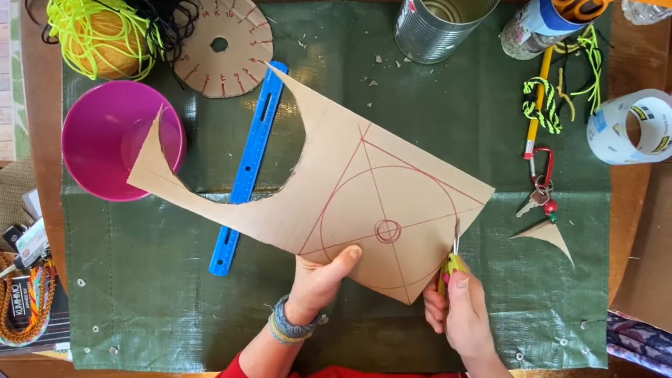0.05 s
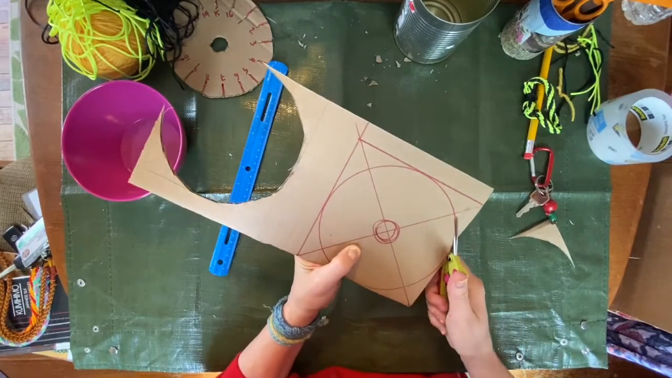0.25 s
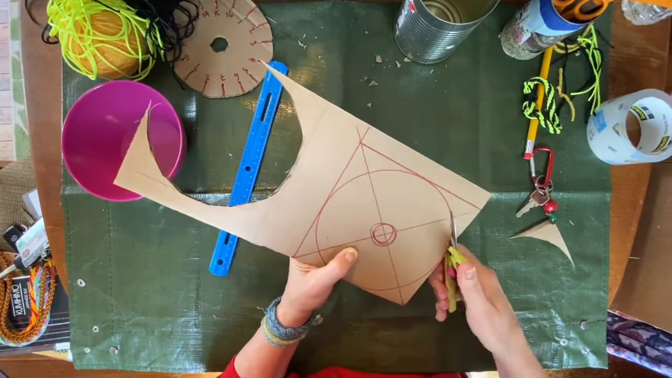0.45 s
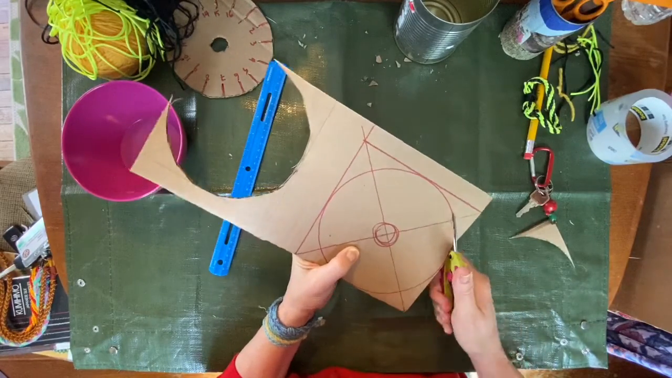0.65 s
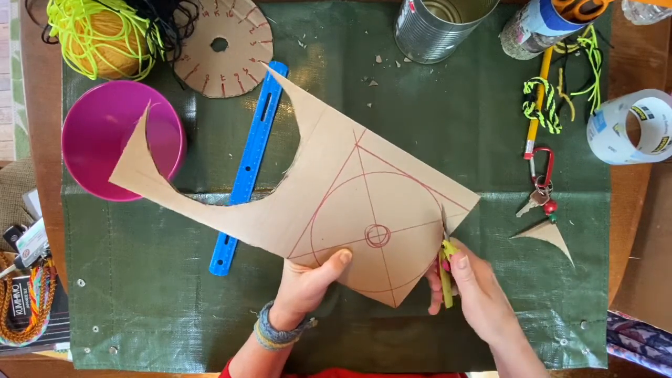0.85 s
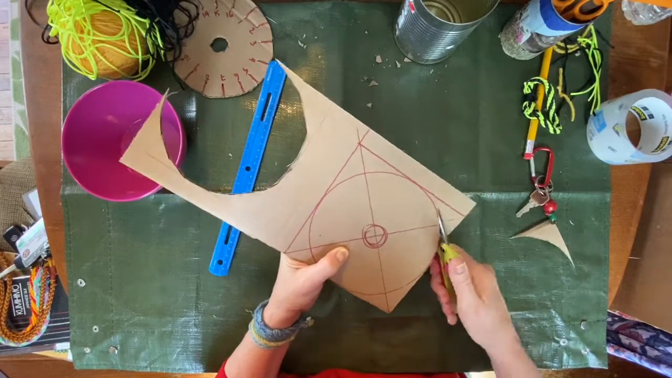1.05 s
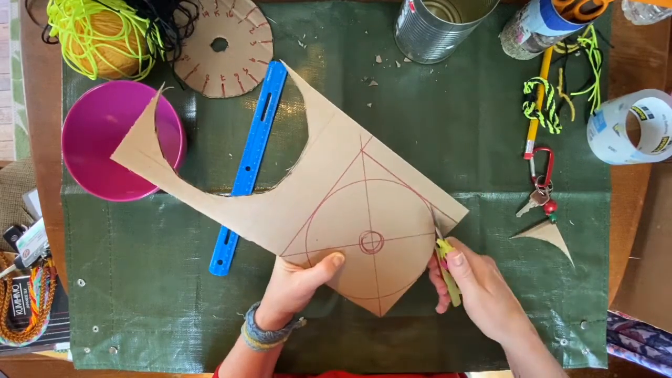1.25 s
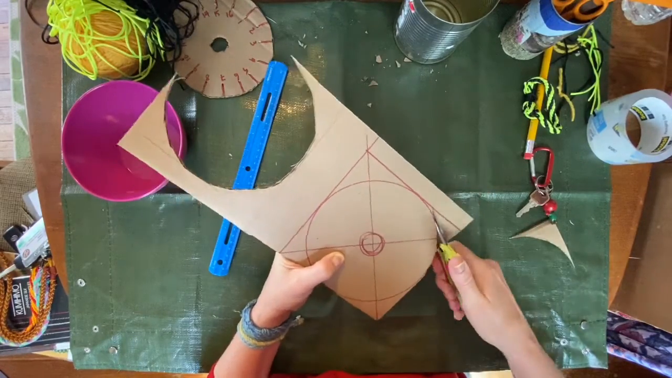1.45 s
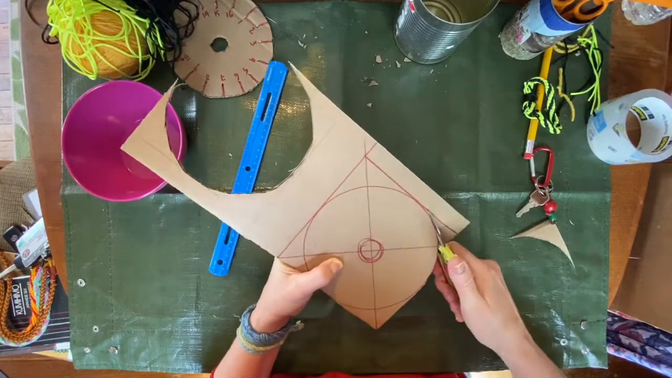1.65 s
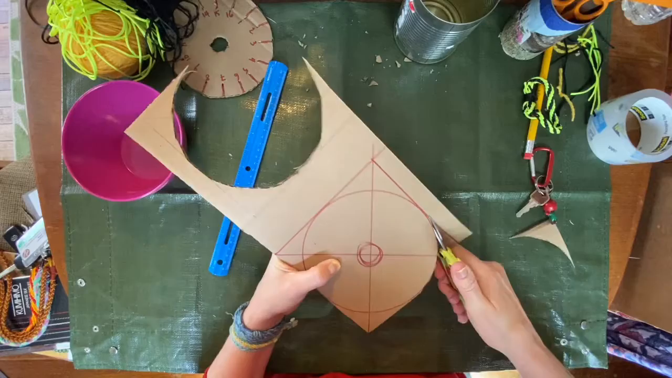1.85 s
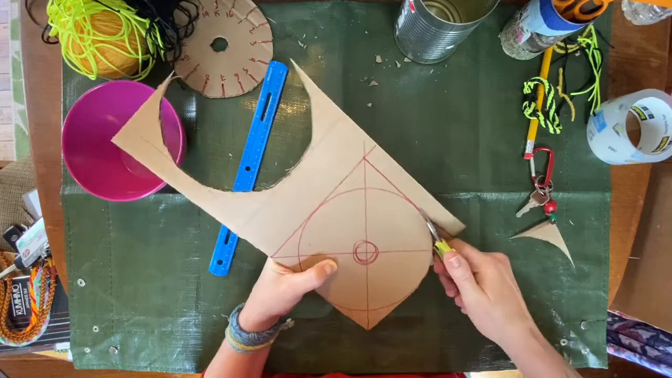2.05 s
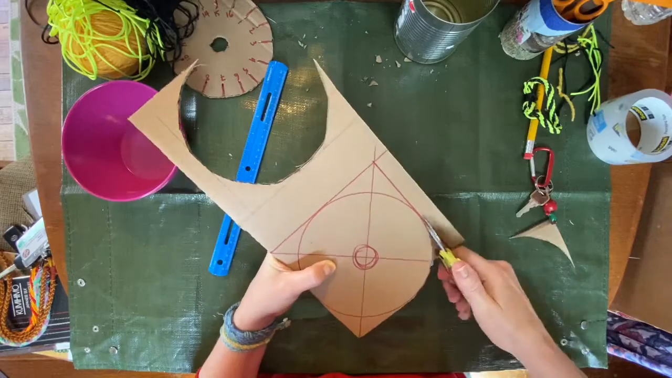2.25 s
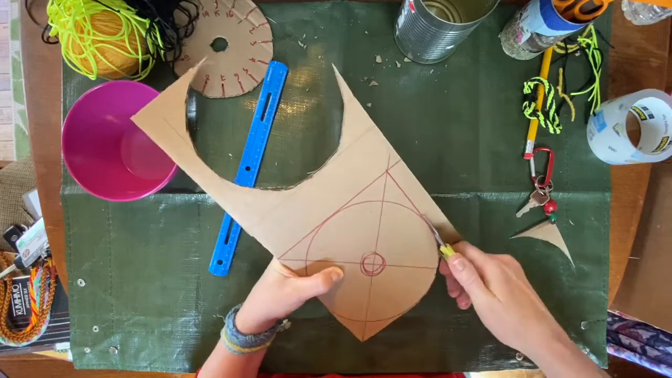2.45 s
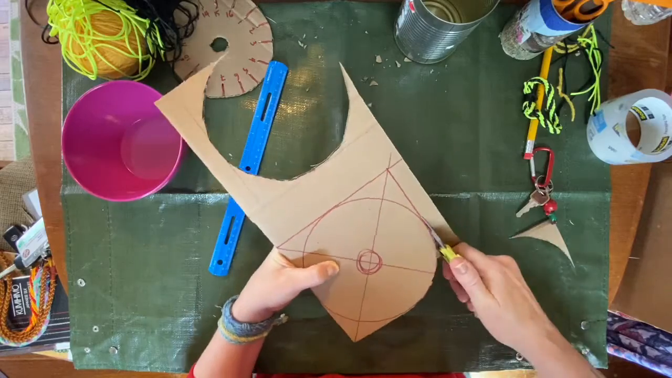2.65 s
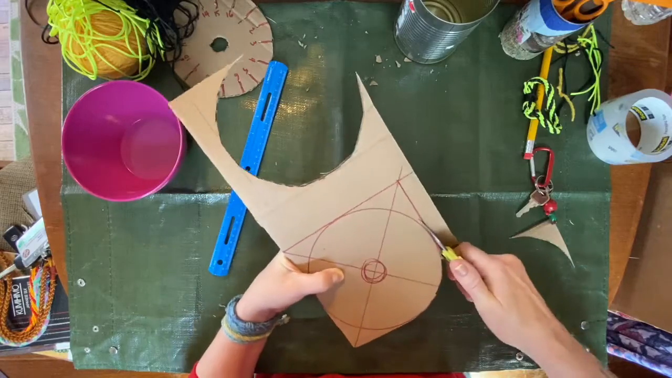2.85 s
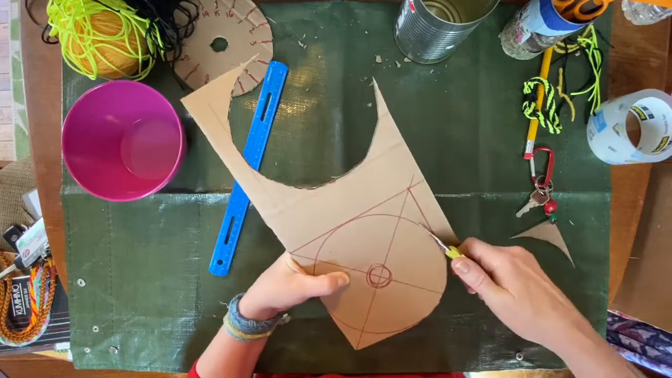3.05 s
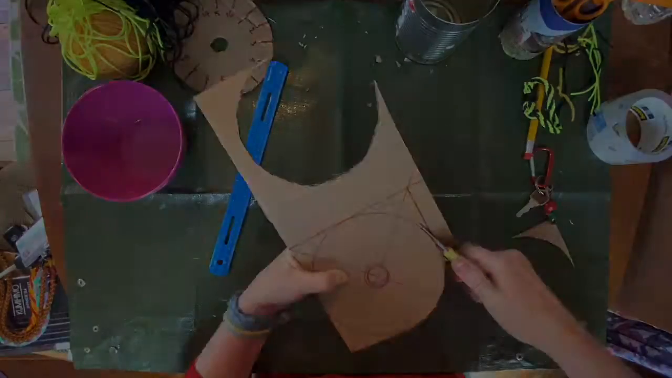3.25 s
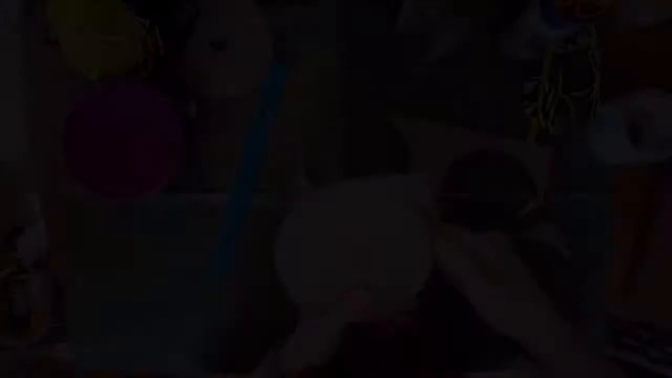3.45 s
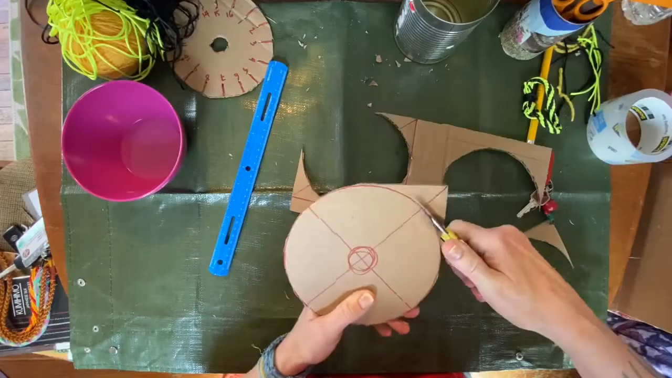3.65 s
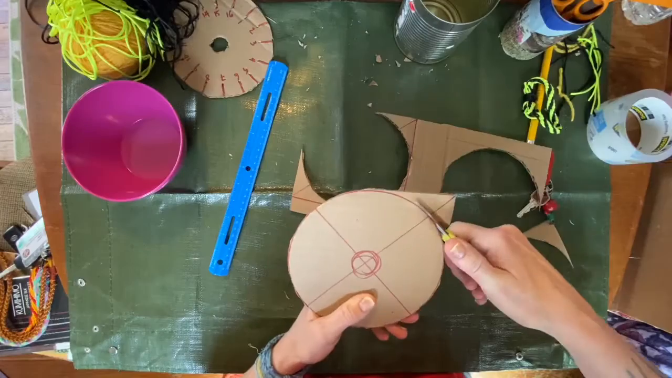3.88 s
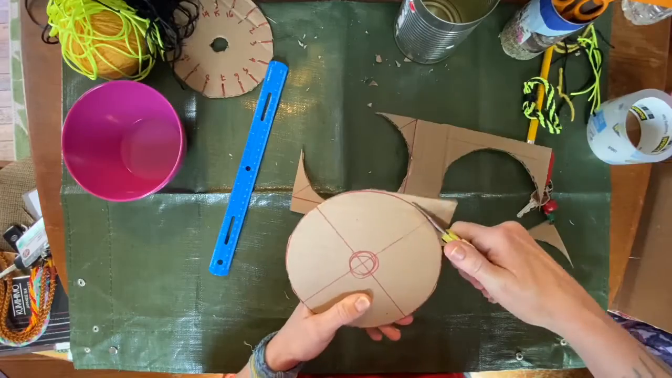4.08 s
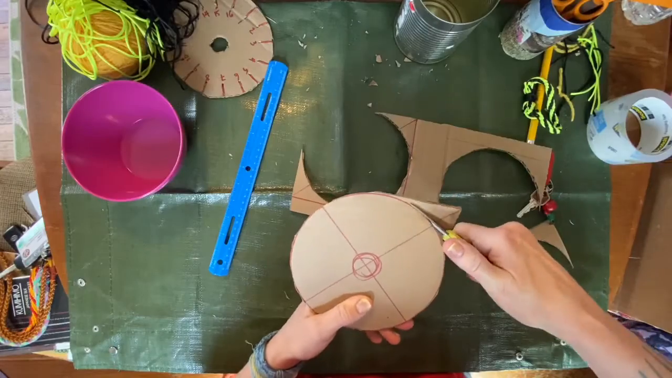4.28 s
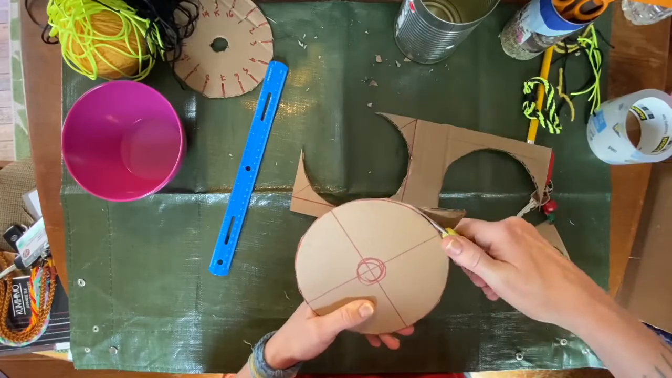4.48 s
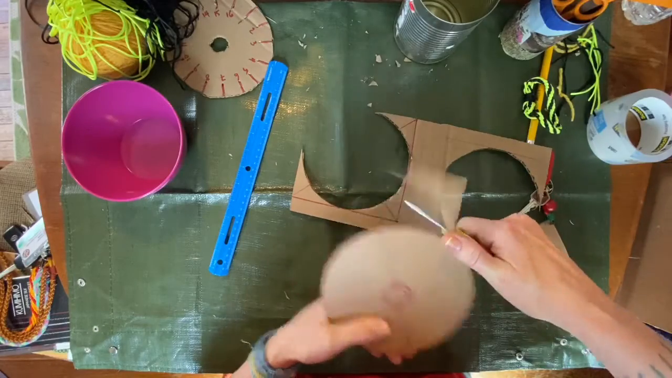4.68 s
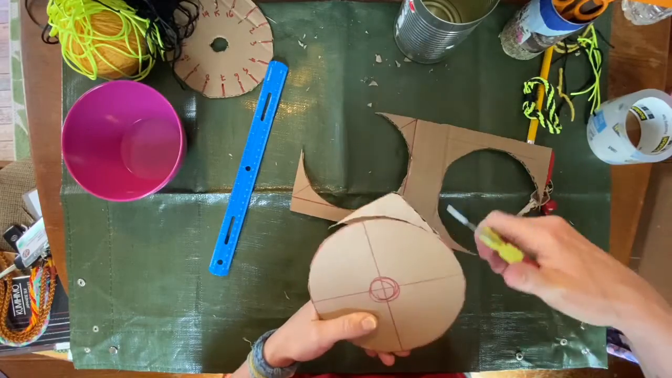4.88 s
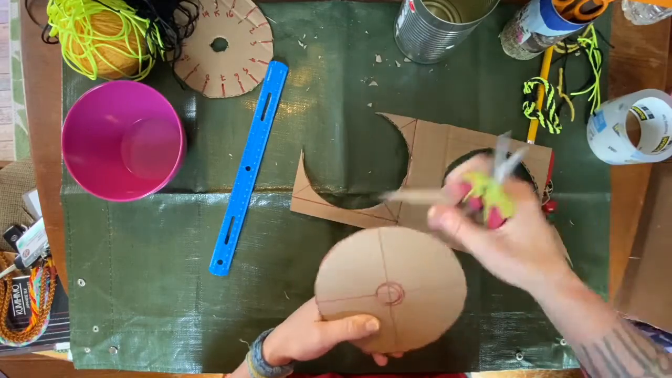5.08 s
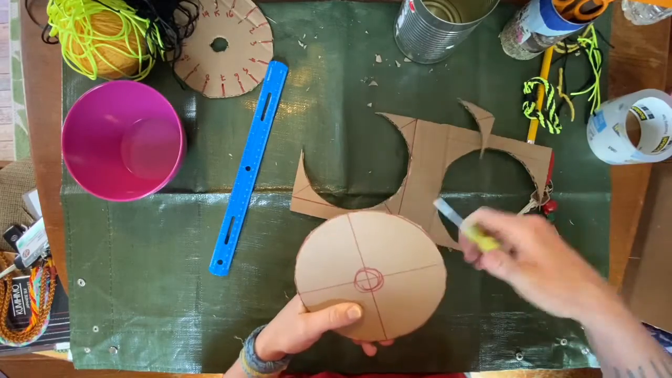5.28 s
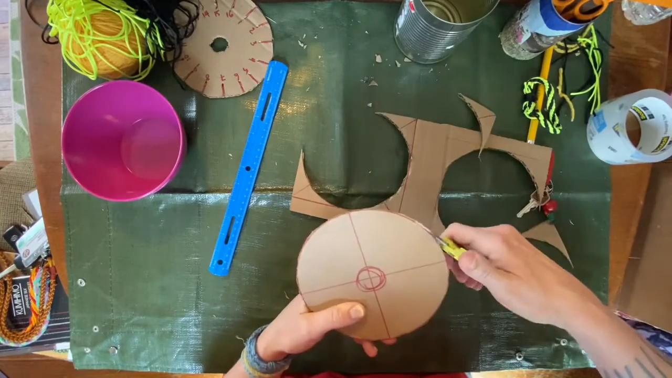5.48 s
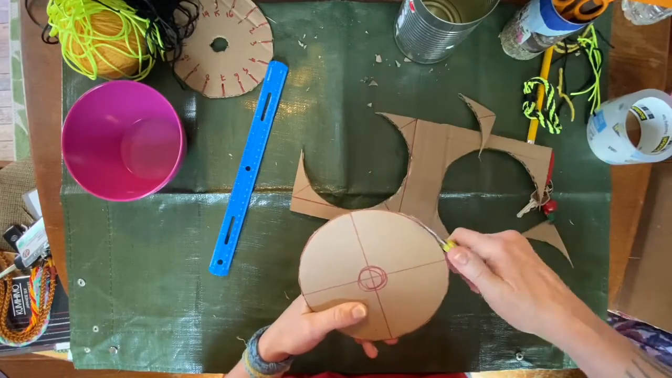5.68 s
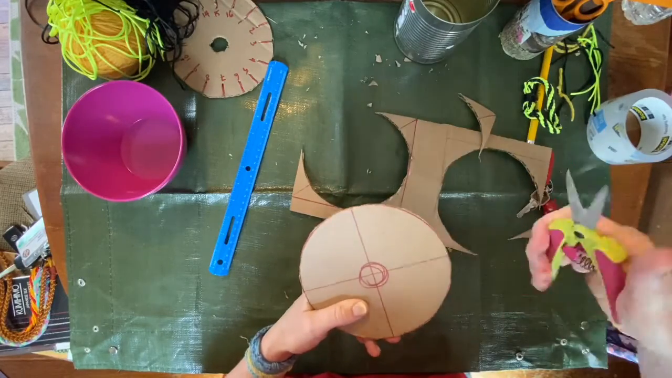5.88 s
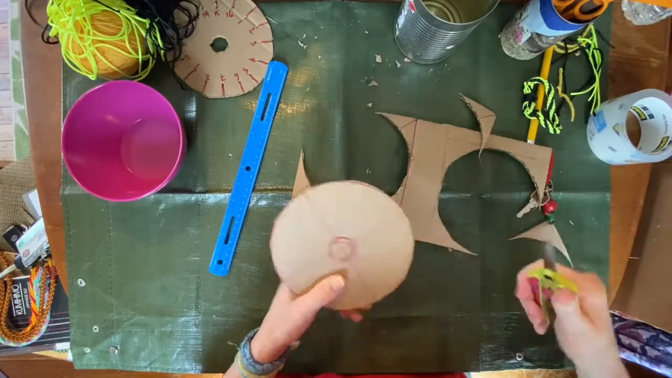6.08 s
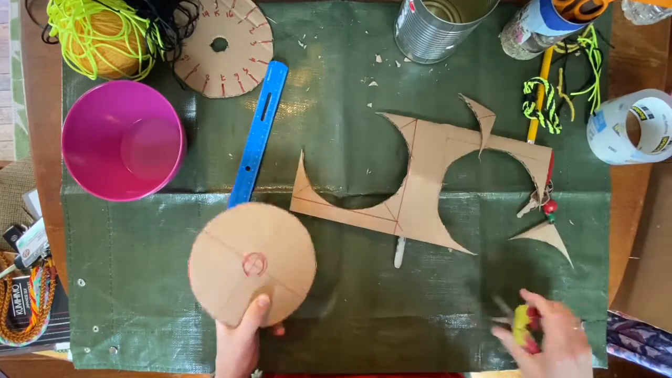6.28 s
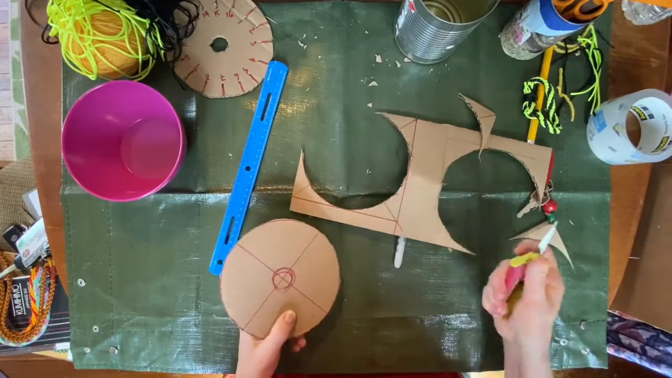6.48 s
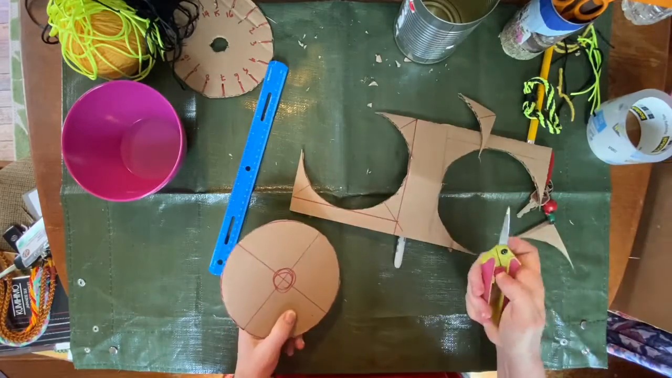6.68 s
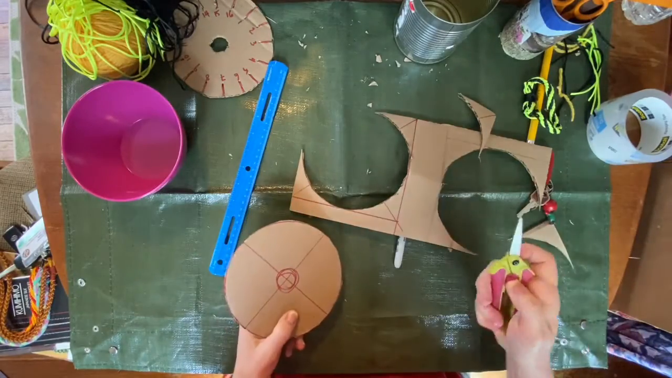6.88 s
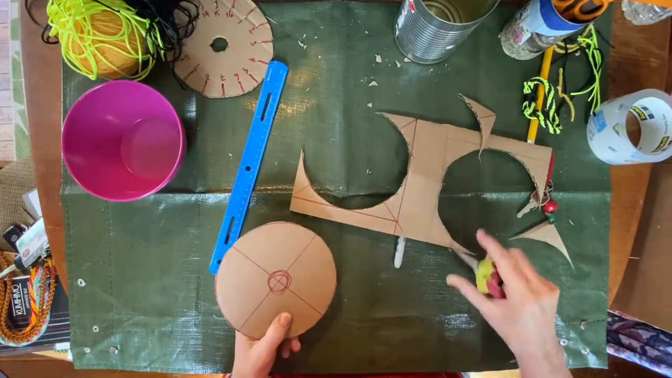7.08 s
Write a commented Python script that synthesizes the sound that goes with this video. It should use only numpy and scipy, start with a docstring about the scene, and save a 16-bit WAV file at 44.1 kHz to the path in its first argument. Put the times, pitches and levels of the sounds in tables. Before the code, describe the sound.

Crisp, irregular scissor cuts crack through a cardboard sheet, with soft blade scraping between them, thinning out near the end.

```python
"""Small scissors snip round a disc of corrugated cardboard over a table, a phone looking down on it. Each bite
cracks the fibres and rings the sheet; between bites the blades scrape along the cut in dense stick-slip ticks.
A fridge-like motor hum and room air fill the small room. Near the end the background level drops and returns in
surges while the phone mount rumbles and creaks."""
import sys
import numpy as np
from scipy import signal
from scipy.fft import rfft, irfft
from scipy.io import wavfile
from scipy.ndimage import uniform_filter1d

SR = 44100
rng = np.random.default_rng(int(sys.argv[2]) if len(sys.argv) > 2 else 0)


def dump_mix(stems):
    """Bounce the given channels to the path in sys.argv[1] as a 16-bit WAV at rate SR."""
    frames = np.atleast_2d(stems).T  # one column per channel
    limited = np.clip(frames, -1, 1)  # hard clip at full scale
    pcm = np.round(limited * 32767).astype(np.int16)
    wavfile.write(sys.argv[1], SR, pcm)


N = 314433
LEFT_RIGHT = np.array([[1], [-1]])


def undb(db):
    return 10 ** (np.asarray(db) / 20)


def at_rms(x, db):
    return x * undb(db) / np.sqrt(np.mean(x ** 2))


def at_peak(x, db):
    """Scale so the envelope over the loudest 3 ms reaches db."""
    return x * undb(db) / np.sqrt(2 * uniform_filter1d(x ** 2, int(.003 * SR)).max())


def along(table, hz):
    """Read (Hz, value) points on a log-frequency axis."""
    freqs, values = np.transpose(table)
    return np.interp(np.log(hz + 1), np.log(freqs + 1), values)


def colour(x, table):
    """Filter by (Hz, dB) points."""
    hz = np.fft.rfftfreq(x.shape[-1], 1 / SR)
    return irfft(rfft(x) * undb(along(table, hz)), x.shape[-1])


def mode(hz, centre_hz, t60_s):
    """Spectrum of a clicked resonance: initial amplitude 1, T60 at least 2 ms."""
    pole = np.log(1000) / max(t60_s, .002) + 2j * np.pi * hz
    return SR * pole / (pole ** 2 + (2 * np.pi * centre_hz) ** 2)


def drift(rate_hz):
    """Random steps, smoothed twice; spread near 1."""
    hold = int(SR / rate_hz)
    steps = np.repeat(rng.standard_normal(N // hold + 1), hold)
    return 1.3 * uniform_filter1d(uniform_filter1d(steps, hold), hold)[:N]


# Motor tones. Each row: frequency in Hz, RMS level in dB before the fader.
HUM_TONES = [(59, -96), (118, -71), (240, -71.5), (1685, -85)]
# Room air. Each row: frequency in Hz, relative level in dB.
AIR_SPECTRUM = [(24, -62), (40, -39.5), (81, -21.5), (118, -2), (180, -27), (243, -5.5), (312, -18.5),
                (422, -17), (630, -35.5), (1720, -51), (2050, -47), (16000, -61.5)]
# Background faders, end values held. Each row: time in seconds, hum and air gain in dB,
# mount rumble in dB, mount creak in dB.
FADERS = [(6.774, -8, -93.5, -100), (6.794, -24, -76.5, -93), (6.83, -24, -64, -91),
          (6.925, -7.5, -66.5, -79), (6.954, -14.5, -46.5, -73), (6.984, -12, -51, -81),
          (7.05, -13.5, -61, -84.5), (7.066, 0.5, -57, -65), (7.095, 0.5, -43.5, -87),
          (7.13, -14, -50, -75)]


def fader(column):
    points = np.array(FADERS)
    return undb(np.interp(np.arange(N) / SR, points[:, 0], points[:, column]))


def hum_and_air():
    """Motor tones waver in phase over nearly mono room air."""
    t = np.arange(N) / SR
    hum = sum(np.sqrt(2) * undb(db) * np.sin(2 * np.pi * hz * t + .66 * drift(8)) for hz, db in HUM_TONES)
    mid, side = colour(rng.standard_normal((2, N)), AIR_SPECTRUM)
    air = at_rms(mid + undb(-20) * side * LEFT_RIGHT, -54) * undb(1.5 * drift(2.7))
    return (hum + air) * fader(1)


def stick_slip(ticks_per_s=2200, spread_db=3.5, smooth_share=1.1):
    """Spectrum of fibres giving under the blades; pressure flutters over the corrugations."""
    hits = rng.random(N) < ticks_per_s / SR
    sizes = undb(spread_db * np.minimum(rng.exponential(size=N), 4))
    ticks = at_rms(hits * sizes * rng.standard_normal(N), 0)
    friction = ticks + smooth_share * rng.standard_normal(N)
    return rfft(friction * undb(1.8 * drift(110) + 1.8 * drift(40)))


# Fibre crunch and the brighter crack. Each row: frequency in Hz, relative level in dB.
CRUNCH_SPECTRUM = [(1200, -21.5), (2300, -15.5), (3000, -5), (3900, -4.5), (5200, -3), (6500, -8),
                   (9000, -22)]
CRACK_SPECTRUM = [(4000, -27.5), (6500, -3), (8200, 2.5), (10000, 4.5), (12800, 5), (15500, -5)]


def fibre_hiss(friction, hz, crack_db=-10.5, patchy_db=4.5):
    """Fibres give unevenly, so five bands of hiss swell independently."""
    centres_hz = 2500 * 1.6 ** np.arange(5)[:, None]
    bands = np.exp(-(np.log2((hz + 1) / centres_hz) / .45) ** 2)
    bands /= bands.sum(axis=0) + 1e-3
    bright = friction * (undb(along(CRUNCH_SPECTRUM, hz)) + undb(along(CRACK_SPECTRUM, hz) + crack_db))
    return at_rms(sum(undb(patchy_db * drift(35)) * irfft(bright * band, N) for band in bands), 0)


# Cardboard modes. Each row: frequency in Hz, relative level in dB, nominal T60 in seconds.
SHEET_MODES = [(197, -6, 0.036), (315, -15.5, 0.015), (495, -7, 0.017), (784.3, -6.5, 0.037),
               (998, -4.5, 0.023), (1273, -5, 0.022), (1387, -4.5, 0.032), (1618, -3.5, 0.053),
               (1793, -1, 0.018), (1991, -8.5, 0.061), (2020, -1, 0.0016)]


def sheet_rasp(friction, hz, t60_scale=.39):
    """Friction drives the hand-damped sheet, less its two lowest modes."""
    sheet = sum((-1) ** k * undb(db) * mode(hz, mode_hz, t60_scale * t60_s)
                for k, (mode_hz, db, t60_s) in enumerate(SHEET_MODES[2:]))
    return at_rms(irfft(friction * sheet / (1 + (hz / 3200) ** 4), N), 0)


# Blade strokes. Each row: start in seconds, length in seconds, rasp level in dB, hiss in dB re rasp.
STROKES = [(0.025, 0.15, -63.5, 0), (0.345, 0.07, -55.5, 3.5), (0.416, 0.064, -54, -3),
           (0.543, 0.038, -50.5, -7), (0.603, 0.1, -61.5, 6), (0.75, 0.029, -53.5, 5),
           (0.79, 0.041, -55, 0), (0.84, 0.055, -62.5, 1.5), (0.926, 0.035, -56, -1.5),
           (0.977, 0.075, -52.5, -0.5), (1.104, 0.042, -54, 0), (1.174, 0.06, -51.5, 5),
           (1.219, 0.076, -59.5, -9), (1.335, 0.075, -56, -5.5), (1.522, 0.1, -55.5, -8.5),
           (1.638, 0.048, -65, 6), (1.73, 0.046, -66, -3), (1.888, 0.033, -50.5, 2),
           (1.914, 0.066, -61, -4), (2.032, 0.045, -58.5, -4), (2.114, 0.019, -59, 1.5),
           (2.28, 0.025, -54, -9), (2.359, 0.076, -63, -1), (2.411, 0.015, -53, 4), (2.482, 0.025, -64, 2),
           (2.526, 0.14, -65, 1.5), (2.709, 0.044, -53, 6.5), (2.766, 0.038, -53.5, -2),
           (2.841, 0.028, -71, 13), (3.003, 0.04, -55, 7.5), (3.054, 0.047, -56, -5),
           (3.151, 0.065, -57.5, 1.5), (3.313, 0.027, -52, 5.5), (3.346, 0.067, -59, 2),
           (3.584, 0.061, -61, 8), (3.736, 0.045, -56, -0.5), (3.874, 0.018, -58, -20),
           (3.897, 0.033, -54, 9.5), (4.002, 0.059, -64.5, 5), (4.127, 0.056, -57.5, 1),
           (4.221, 0.021, -58, 2.5), (4.288, 0.049, -62, 7.5), (4.447, 0.089, -56.5, 5.5),
           (4.589, 0.027, -65, 11), (4.634, 0.027, -53.5, 4.5), (4.73, 0.047, -45.5, -3.5),
           (5.106, 0.033, -55.5, 7), (5.175, 0.047, -69.5, 2), (5.26, 0.014, -66.5, 14.5),
           (5.325, 0.013, -59.5, 5), (5.394, 0.019, -61, -3), (5.435, 0.021, -71, 14),
           (5.559, 0.031, -83.5, -8), (5.682, 0.05, -59, 5), (5.866, 0.027, -82.5, 15),
           (6.015, 0.044, -75, 10.5), (6.092, 0.063, -69, 13.5), (6.15, 0.098, -67.5, 5.5),
           (6.253, 0.15, -71, 5), (6.423, 0.03, -71.5, 14.5), (6.575, 0.046, -69, -14),
           (6.72, 0.036, -84, -1), (6.81, 0.09, -77, -8), (7.002, 0.047, -83, 8)]
# Strip between the blades. Each row: time in seconds, pitch in Hz.
STRIP_PITCH = [(0, 3930), (1.6, 4030), (2.1, 4700), (2.7, 3380), (3.45, 3430), (3.55, 1730), (4.9, 1770),
               (5.1, 2900), (5.4, 1826), (5.8, 1850), (6.0, 2780), (6.3, 4500), (6.55, 1600), (6.8, 3750),
               (7.0, 2280)]


def blade_scrapes(rise_s=.0051, fade_s=.0046, swell_db=3.2, sag_db=-5, sing_db=-14.5):
    """Sliding blades rasp and hiss, and the strip between them sings; pressure swells, then sags."""
    t, hz = np.arange(N) / SR, np.fft.rfftfreq(N, 1 / SR)
    friction = stick_slip()
    rasp, hiss, slip = sheet_rasp(friction, hz), fibre_hiss(friction, hz), irfft(friction, N)
    out = np.zeros(N)
    for start_s, length_s, rasp_db, bright_db in STROKES:
        span = slice(max(int((start_s - .05) * SR), 0), int((start_s + length_s + .1) * SR))
        age_s = t[span] - start_s
        gate = np.exp(np.minimum(age_s, 0) / rise_s - np.maximum(age_s - length_s, 0) / fade_s)
        progress = np.clip(age_s / length_s, 0, 1)
        pressure = undb(swell_db * np.sin(np.pi * progress) + sag_db * (progress - .5))
        hiss_db = rasp_db + bright_db
        strip = signal.iirpeak(np.interp(start_s, *np.transpose(STRIP_PITCH)), Q=9, fs=SR)
        sing = at_rms(signal.lfilter(*strip, slip[span]), max(rasp_db, hiss_db) + sing_db)
        out[span] += gate * pressure * (undb(rasp_db) * rasp[span] + undb(hiss_db) * hiss[span] + sing)
    shifting_fingers = (rasp + hiss) * undb(-89 + 6 * drift(14))
    return out + shifting_fingers


def fibre_burst(ms, strain_ms=.9, tear_ms=1.69, creak_ms=4, fray_ms=7.6, grit_db=15.5):
    """Spectrum of one gritty break: fibres creak and strain before 0 ms, tear and fray after."""
    before = np.exp(-abs(ms) / strain_ms) + undb(-24) * np.exp(-abs(ms) / creak_ms)
    after = np.exp(-abs(ms) / tear_ms) + undb(-20.5) * np.exp(-abs(ms) / fray_ms)
    noise, roughness = rng.standard_normal((2, len(ms)))
    grit = undb(grit_db * uniform_filter1d(roughness, size=9))
    return rfft(noise * grit * np.where(ms < 0, before, after))


# Blade bites. Each row: time in seconds, ring level in dB, ring pitch in Hz, crunch in dB re ring,
# crunch pitch in Hz, crack in dB re ring, bass in dB re ring.
BITES = [(0.0925, -32, 2080, -4, 3040, -1.5, -8.5), (0.1009, -31.5, 1700, -8, 3500, -8, -11),
         (0.264, -25.5, 1860, -1, 6400, -8, -18.5), (0.2791, -33, 1410, -1.5, 3560, -5, -9),
         (0.5653, -40, 1740, 5, 4300, -11, -2.5), (0.6061, -29, 1720, -11, 3100, -25, -14),
         (0.6235, -30.5, 1420, -8, 6500, -5, -5.5), (0.6597, -22, 2040, -8.5, 6700, -9, -20),
         (0.6832, -29, 1110, -1, 6500, -6, -9.5), (0.9927, -39.5, 930, 0, 4100, 4.5, -10),
         (1.0129, -22.5, 2070, -6.5, 2900, -6, -10.5), (1.0276, -15.5, 2170, -4, 3970, -9.5, -21),
         (1.122, -37, 1920, -0.5, 4440, 5, 2), (1.3873, -22.5, 2420, -14, 3830, -15, -5),
         (1.4218, -16.5, 2160, -2.5, 4880, -16.5, -21), (1.5108, -15.5, 1990, -16, 2820, -4, -11.5),
         (1.7035, -28.5, 1330, -2, 5200, -6, -4.5), (1.7174, -27, 2220, 3, 4270, -4.5, -8),
         (1.7881, -21, 950, 2, 4380, -3.5, -14.5), (1.82, -32, 930, -5, 3850, -7.5, -5.5),
         (1.9875, -26, 2270, -7.5, 4020, -23, -12.5), (1.9958, -34, 1650, -28, 2800, -23, -5.5),
         (2.0109, -31, 1605, -34, 2900, -23, -4.5), (2.1524, -22.5, 910, -10.5, 2980, -12, -16),
         (2.171, -11.5, 1810, -8, 2950, -3, -17), (2.2541, -33, 1740, -6, 3600, -11, -2),
         (2.27, -30.5, 1260, -4.5, 3460, -15, -16), (2.426, -31, 915, -22, 5600, -10.5, -2),
         (2.5758, -39.5, 960, -2, 3300, -4, -6), (2.607, -20.5, 1740, -20, 3250, -24, -13.5),
         (2.623, -14.5, 1680, -5, 3320, -18.5, -24), (2.883, -29, 980, -4.5, 3300, -12, -8.5),
         (2.8995, -14, 1500, -13, 3620, -12.5, -20), (2.9216, -23, 1660, -2, 3620, -14, -10),
         (3.175, -23, 1630, -14, 3400, -16, -12.5), (3.2092, -22.5, 1630, -0.5, 3440, -10.5, -16.5),
         (3.2208, -14.5, 1560, -9.5, 3420, -8.5, -20), (3.4565, -46, 1370, -5, 2800, -3, -14),
         (3.486, -29, 1620, -4.5, 2800, -10, -23), (3.4941, -16.5, 1700, -6.5, 5940, -17.5, -22),
         (3.7775, -36.5, 1650, -1, 2780, 5, -7), (3.7829, -12.5, 1695, -19.5, 3050, -13.5, -18.5),
         (4.0326, -32.5, 1740, 7.5, 5800, 3, -5), (4.0406, -17, 1640, 0, 5800, -10, -35),
         (4.1383, -33, 1540, -11.5, 5500, -11, -6.5), (4.3238, -37.5, 1780, 2, 3030, 1, -8),
         (4.3524, -23.5, 1600, -1.5, 5880, -11.5, -11), (4.6797, -24, 1680, 2, 5500, -14.5, -13),
         (4.7138, -19, 1750, 4, 3660, 0.5, -2), (4.7522, -25.5, 815, -0.5, 3230, 1, 0.5),
         (5.1118, -33.5, 1590, 8.5, 3420, 10, 0), (5.141, -31.5, 1560, -2.5, 5700, 3, -6),
         (5.2667, -47, 2300, -6, 3700, 7.5, -16), (5.3373, -44.5, 1980, -3, 3870, -4, -9),
         (5.379, -46.5, 1980, -6, 4540, -4, -19), (5.3997, -50, 850, 1, 3000, -4, 12.5),
         (5.5604, -61, 910, 5.5, 5370, 0, 4), (5.6877, -53.5, 1560, 11.5, 5270, 6.5, -3),
         (5.7094, -46, 1930, 8, 5100, -8.5, -9), (5.7478, -17, 1620, 6, 3660, -1, -6),
         (6.0219, -49, 1580, 13, 5340, 17, -15), (6.141, -46, 1620, 12.5, 5260, 18, -12),
         (6.233, -62.5, 2790, 19.5, 2760, -10, -1), (6.4347, -58.5, 1150, 19.5, 5230, 21, 4)]
# Boom of the held sheet. Each row: time in seconds, centre in Hz.
BOOM_PITCH = [(0, 670), (2.6, 557), (3.5, 320), (4.1, 529), (4.7, 680), (5.2, 603), (5.75, 776),
              (6.5, 418.6)]


def blade_bites(reach_oct=.82, split_hz=900, scatter_db=5, detune=.034, flap_db=11, ping_db=-17.5):
    """Each break crunches, cracks and rings the blade-damped flap and the sheet modes near its pitch."""
    size, lead = 8192, 1024
    ms, hz = (np.arange(size) - lead) * 1000 / SR, np.fft.rfftfreq(size, 1 / SR)
    modes_hz = np.array(SHEET_MODES)[:, 0]
    out = np.zeros(N + size)
    for time_s, ring_db, ring_hz, crunch_db, crunch_hz, crack_db, bass_db in BITES:
        burst = fibre_burst(ms)
        jitter = rng.standard_normal((2, len(SHEET_MODES)))
        modes = np.array([undb(db + scatter_db * louder) * mode(hz, mode_hz * (1 + detune * sharp), t60_s)
                          for (mode_hz, db, t60_s), louder, sharp in zip(SHEET_MODES, *jitter)])
        boom_hz = np.interp(time_s, *np.transpose(BOOM_PITCH))
        ring_weights = (modes_hz > split_hz) / (1 + (np.log2(modes_hz / ring_hz) / reach_oct) ** 2)
        bass_weights = (modes_hz <= split_hz) / (1 + (np.log2(modes_hz / boom_hz) / reach_oct) ** 2)
        ring = ring_weights @ modes + undb(flap_db) * mode(hz, ring_hz, t60_s=.011)
        bass = bass_weights @ modes / (1 + (hz / 1100) ** 4)
        ping = undb(ping_db) * mode(hz, crunch_hz, t60_s=.006)
        crunch = undb(along(CRUNCH_SPECTRUM, hz)) * (1 + ping)
        crack = undb(along(CRACK_SPECTRUM, hz))
        first = int(time_s * SR) - lead
        for db, response in (0, ring), (bass_db, bass), (crunch_db, crunch), (crack_db, crack):
            out[first:first + size] += at_peak(irfft(burst * response, size), ring_db + db)
    return out[:N]


def phone_mount():
    """The shaken mount rumbles and creaks at the end."""
    mid, side, noise = rng.standard_normal((3, N))
    rumble = colour(mid + .08 * side * LEFT_RIGHT,
                    [(15, -25.5), (35, 11), (70, 6.5), (150, -.5), (400, -54.5)])
    creak = colour(noise, [(100, -9.5), (250, -3.5), (600, -3.5), (1500, -12.5), (4000, -41)])
    return at_rms(rumble, 0) * fader(2) + at_rms(creak, 0) * fader(3)


# Room decay. Each row: frequency in Hz, T60 in seconds.
ROOM_T60 = [(200, 0.27), (1000, 0.15), (4000, 0.13), (15000, 0.093)]
# Tail colour. Each row: frequency in Hz, gain in dB.
ROOM_GAIN = [(200, -15.5), (1000, -12), (2500, -16.5), (6000, -13.5), (15000, -9)]


def room_echo(x, mono_below_hz=2500, onset_s=.002):
    """Table and walls return a short tail, each octave fading at its own rate."""
    t, tail = np.arange(SR // 4) / SR, 0
    for hz in 180 * 2. ** np.arange(7):
        octave = signal.butter(2, [hz / np.sqrt(2), hz * np.sqrt(2)], "band", fs=SR, output="sos")
        decay = undb(-60 * t / along(ROOM_T60, hz))
        mid, side = signal.sosfilt(octave, rng.standard_normal((2, len(t)))) * decay
        tail = tail + mid + side * LEFT_RIGHT * hz / (hz + mono_below_hz)
    tail *= 1 - np.exp(-t / onset_s)
    tail = colour(tail / np.sqrt(np.sum(tail ** 2) / 2), ROOM_GAIN)
    return signal.fftconvolve(x[None], tail, axes=1)[:, :N]


# Phase between the ports. Each row: frequency in Hz, left lead in radians.
PORT_LEAD = [(100, .1), (500, .25), (1200, .65), (1700, .95), (3400, 0.95), (5000, 1.05), (8300, 1.17),
             (10000, 2.8), (12500, 1.8), (16000, 2.4)]
# Balance of the ports. Each row: frequency in Hz, left minus right in dB.
PORT_BALANCE = [(100, -3), (700, -2), (1300, -3.5), (2400, 2.5), (4400, -0.5), (8000, -1.5), (15000, -3.5)]


def microphone_ports(x, wander_share=.37, wander_hz=25):
    """Two close ports differ in phase and colour; the lag strays as the hands move."""
    hz = np.fft.rfftfreq(N, 1 / SR)
    phase = .5j * along(PORT_LEAD, hz) * LEFT_RIGHT
    heard = rfft(x) * undb(along(PORT_BALANCE, hz) / 2 * LEFT_RIGHT) * np.exp(phase)
    return irfft(heard, N) + wander_share * drift(wander_hz) * irfft(heard * phase, N)


def scene():
    """Cutting and its echo at the ports, over hum, air and mount noise."""
    low_cut = signal.butter(2, 130, "high", fs=SR, output="sos")  # the cutting sounds carry no deep bass
    cutting = signal.sosfilt(low_cut, blade_bites() + blade_scrapes())
    return microphone_ports(cutting + room_echo(cutting)) + hum_and_air() + phone_mount()


def record(dry, top_hz=16100):
    """The phone rounds the loudest peaks and cuts the top."""
    return signal.sosfilt(signal.ellip(10, .2, 80, top_hz, fs=SR, output="sos"), np.tanh(dry))


dry = scene()
out = record(dry)
dump_mix(out)
```